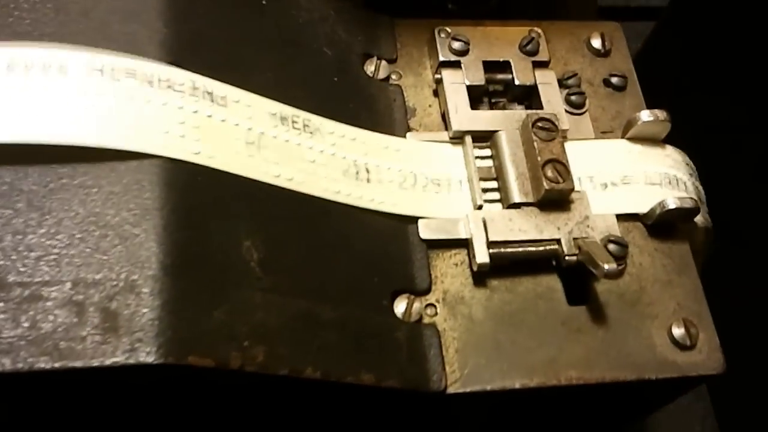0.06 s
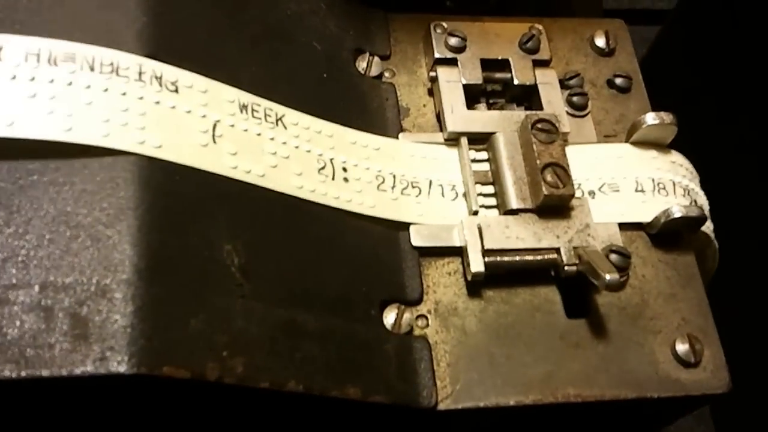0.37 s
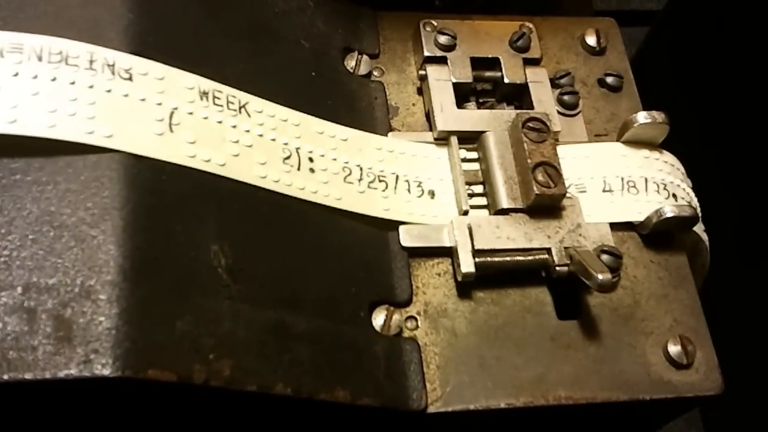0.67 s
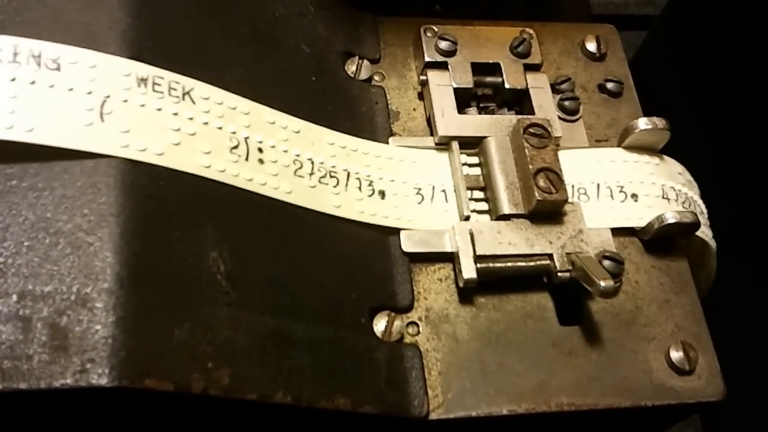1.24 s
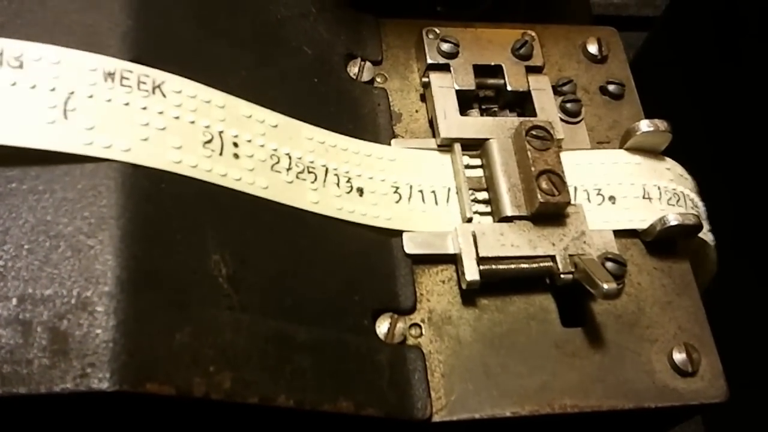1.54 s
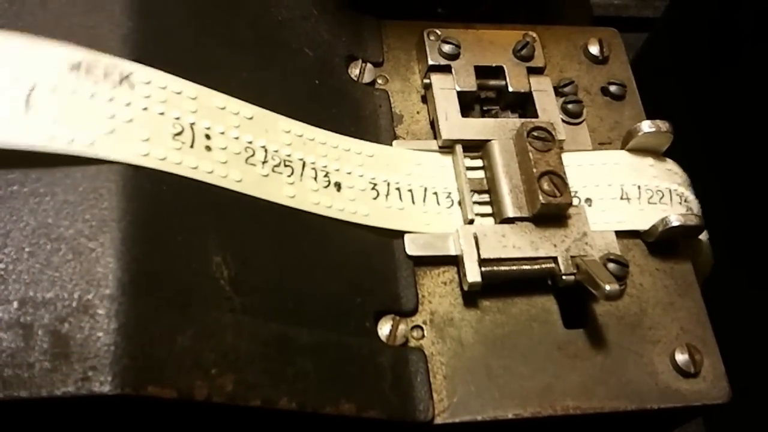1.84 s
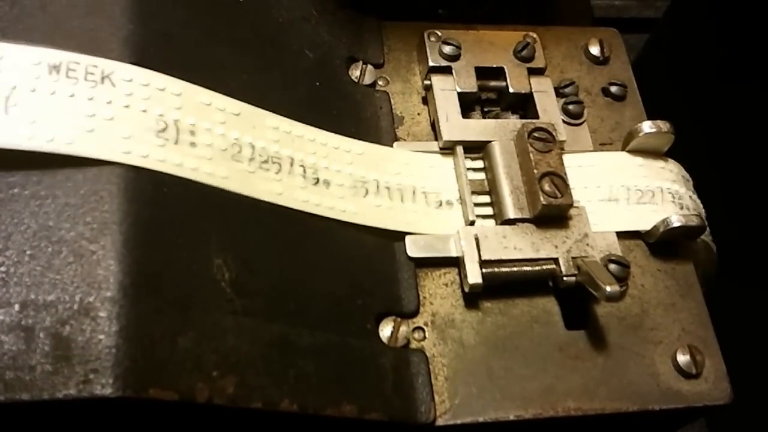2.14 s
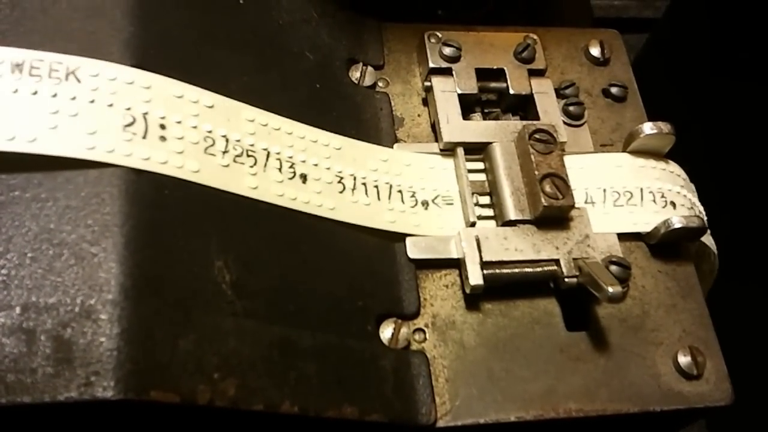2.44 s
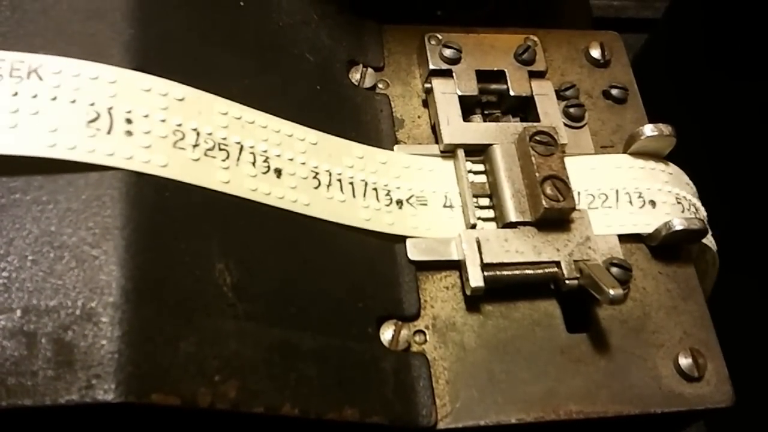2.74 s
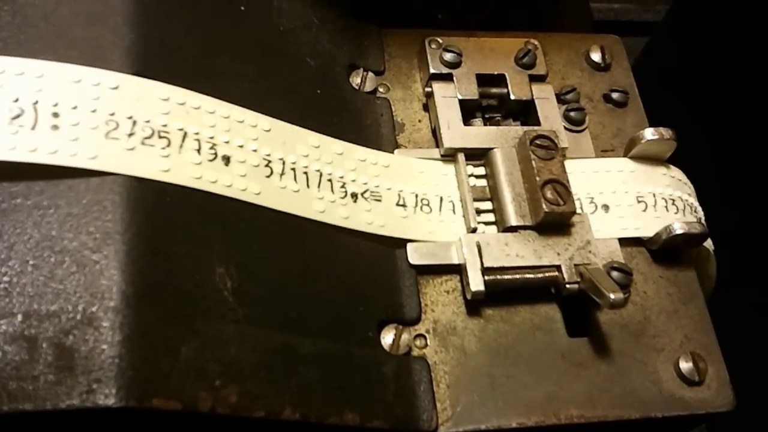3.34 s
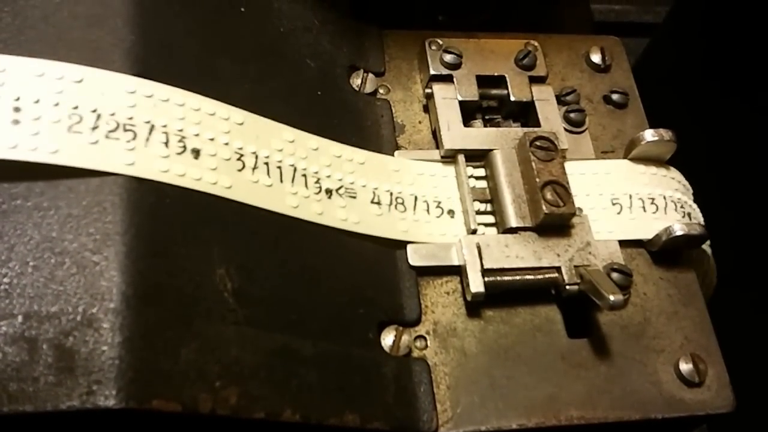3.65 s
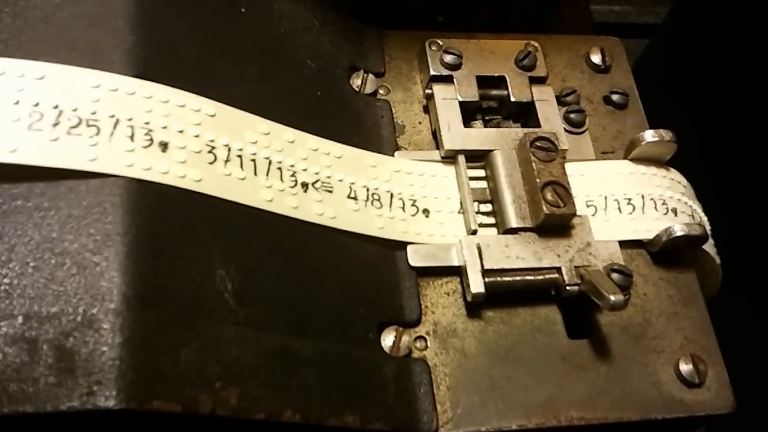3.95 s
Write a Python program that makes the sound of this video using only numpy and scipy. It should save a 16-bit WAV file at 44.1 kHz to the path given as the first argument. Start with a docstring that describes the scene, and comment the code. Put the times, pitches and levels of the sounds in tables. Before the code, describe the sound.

A mechanical paper tape reader clacks about six times a second, each step a sharp metallic snap with a brief ring. Its motor hums and gears whir steadily underneath, heard close up in a small room.

```python
"""A mechanical paper tape reader steps about six characters a second, close up in a small room.
Each cam turn throws the sensing pins against the tape, then the feed pawl clacks the tape on.
Every blow is a burst of tiny metal contacts and rings the frame. Underneath, the motor hums
and its gears whir and tick. The hardest clacks overload the recorder."""
import sys
import numpy as np
from scipy import signal
from scipy.fft import rfft, irfft
from scipy.io import wavfile
from scipy.ndimage import uniform_filter1d, minimum_filter1d

SR = 44100
rng = np.random.default_rng(int(sys.argv[2]) if len(sys.argv) > 2 else 0)


def transcribe(u):
    """Save the signal u as a 16-bit wav file named by the first command-line argument.

    u: samples, shape (n,) or (channels, n), limited to [-1, 1]; the rate is SR.
    q: integer samples, one column per channel.
    """
    v = np.clip(np.atleast_2d(u).T, -1, 1)
    q = np.round(v * 32767).astype(np.int16)
    wavfile.write(sys.argv[1], SR, q)


N = 176400

# pin rises, one per cam turn: t/s, relative level/dB
PIN_RISES = [(0.1292, -5), (0.2894, 0.5), (0.4492, 0), (0.608, -1), (0.7656, -3), (0.9275, -4),
             (1.086, -3.5), (1.2451, -3.5), (1.4048, -2), (1.5645, -1), (1.723, -2), (1.8813, -3),
             (2.0407, -1.5), (2.1999, -2.5), (2.36, -1.5), (2.518, -4), (2.6754, -3.5), (2.835, -2.5),
             (2.9946, -3.5), (3.1538, -1), (3.3117, -2.5), (3.475, -2.5), (3.6321, 0), (3.7904, -3.5),
             (3.9489, -2.5)]
# feed pawl blows: t/s, relative level/dB, low knock offset/dB
PAWL_BLOWS = [(0.001, 19, -13), (0.161, 21, -47.5), (0.314, 15, -19.5), (0.47, 12.5, -25.5),
              (0.484, -4.5, -17.5), (0.639, 14, -8.5), (0.792, 12.5, -46.5), (0.798, 4.5, -21.5),
              (0.954, -1.5, -3.5), (0.975, 19.5, -31.5), (1.11, 8.5, -26), (1.27, 8.5, -16),
              (1.434, 17, -11), (1.589, 22.5, -17.5), (1.598, 13.5, -47.5), (1.746, 12, -19.5),
              (1.912, 9.5, -25), (2.068, 8.5, -28.5), (2.226, 9, -15.5), (2.382, 11, -18), (2.391, 10, -22),
              (2.547, -4, -27), (2.698, 15, -25.5), (2.862, 11, -14.5), (3.025, 17, -24.5),
              (3.175, -1.5, -3), (3.337, 16, -14), (3.495, 11, -34), (3.66, 14, -21), (3.817, 11.5, -16.5),
              (3.974, 13, -40.5)]
RISE_S, CHATTER_PER_S = 0.003, 9000


def amp(db):
    """Decibels to gain."""
    return 10 ** (np.asarray(db) / 20)


def unit(x):
    """Scale to rms 1."""
    return x / np.sqrt(np.mean(x ** 2) + 1e-20)


def read(points, hz):
    """Interpolate a table over log frequency."""
    f, value = np.transpose(points)
    return np.interp(np.log(hz + 1), np.log(f + 1), value)


def add(mix, at_s, sound):
    """Mix a sound in at a time."""
    part = mix[max(round(at_s * SR), 0):][:len(sound)]
    part += sound[:len(part)]


def colour(x, spectrum, size=4096):
    """Minimum-phase filter of unit energy; the table sets shape only."""
    cepstrum = irfft(np.log(amp(read(spectrum, np.fft.rfftfreq(size, 1 / SR)))))
    cepstrum[1:size // 2] *= 2
    cepstrum[size // 2 + 1:] = 0
    taps = irfft(np.exp(rfft(cepstrum)))
    return signal.oaconvolve(x, taps / np.linalg.norm(taps))[:N]


def drift(hz):
    """Slow random wander, rms 1."""
    lowpass = np.exp(-(np.fft.rfftfreq(N, 1 / SR) / hz) ** 2)
    return unit(irfft(rfft(rng.standard_normal(N)) * lowpass, N))


def contacts(per_s, spread_db):
    """Tiny clicks of random sign and size, rms 1."""
    size = amp(spread_db * np.clip(rng.standard_normal(N), -2, 2))
    return unit(rng.choice([-1., 1.], N) * size * (rng.random(N) < per_s / SR))


def blows(times_s, levels_db, decay_s, spread_db):
    """Bursts of metal contacts: linear rise, exponential decay."""
    t, power = np.arange(SR // 10) / SR, np.zeros(N)
    envelope = np.minimum(t / RISE_S, 1) * np.exp(-np.maximum(t - RISE_S, 0) / decay_s)
    for at_s, db in zip(times_s, levels_db):
        add(power, at_s - RISE_S / 2, (amp(db) * envelope) ** 2)
    return np.sqrt(power) * contacts(CHATTER_PER_S, spread_db)


def feed_pawl(engage_lag_s=0.0221):
    """The pawl drops into the ratchet just after the pins, then drives it home with a low knock."""
    # clack spectrum: f/Hz, level/dB
    clack_spectrum = [(100, -44.5), (600, -14), (1700, -17.5), (2300, -4), (3000, -3.5), (3250, 1.5),
                      (3550, 4), (4100, -5.5), (4450, 3), (4680, 6), (4950, -3.5), (5500, 3), (6400, -1),
                      (7250, -0.5)]
    # knock spectrum: f/Hz, level/dB
    knock_spectrum = [(50, -71), (150, -25), (300, -17.5), (460, -12), (620, -7), (745, 0.5), (840, -3.5),
                      (960, 0), (1060, -1.5), (1150, 0.5), (1500, -1.5), (2200, -6), (5000, -14)]
    at_s, db, knock_db = np.transpose(PAWL_BLOWS)
    engage_s = np.transpose(PIN_RISES)[0] + engage_lag_s
    engage = blows(engage_s, np.full(len(engage_s), -5.5), decay_s=0.011, spread_db=5.5)
    clack = engage + blows(at_s, db - 11.5, decay_s=0.0072, spread_db=3)
    knock = amp(-4) * engage + blows(at_s, db + knock_db - 9.5, decay_s=0.007, spread_db=3)
    return colour(clack, clack_spectrum) + colour(knock, knock_spectrum)


def frame_ring(vary_db=2, knock_follow=0.2):
    """Each blow rings a new mix of frame modes; the frame gives less than in proportion to the knock."""
    # frame modes: f/Hz, level/dB, T60/s
    frame_modes = [(217.5, -15.5, 0.14), (258.5, -16, 0.15), (277, -25.5, 0.13), (315, -11.5, .12),
                   (371.2, -9, 0.28), (465, -2, 0.059), (482, 2.5, .22), (551, -4, 0.12), (748, -0.5, 0.11),
                   (958, 7, 0.066), (1113.4, 3.5, .1), (3560, 0.5, 0.23), (6000, -8.5, 0.23)]
    hz, mode_db, t60_s = np.transpose(frame_modes)[:, :, None]
    t, ring = np.arange(SR // 3) / SR, np.zeros(N)
    pushes = [(at_s, -5.5) for at_s, _ in PIN_RISES]
    pushes += [(at_s, knock_follow * (db + knock_db)) for at_s, db, knock_db in PAWL_BLOWS]
    modes = amp(mode_db - 60 * t / t60_s) * np.exp(2j * np.pi * hz * t)
    for at_s, db in pushes:
        gains = amp(db + vary_db * rng.standard_normal(len(hz)))
        phasors = np.exp(2j * np.pi * rng.random(len(hz)))
        add(ring, at_s, ((gains * phasors) @ modes).real * np.minimum(t / RISE_S, 1))
    return amp(-28) * unit(ring)


def room(x, gap_s=0.0079):
    """Short diffuse tail; the bass lasts longest."""
    # room decay: f/Hz, T60/s
    decay = [(150, 0.91), (1000, 0.32), (4000, 0.095), (8000, 0.23)]
    hz, t, noise = signal.stft(rng.standard_normal(SR // 2), SR, nperseg=256)
    tail = signal.istft(noise * amp(-60 * t / read(decay, hz)[:, None]), SR, nperseg=256)[1]
    tail *= np.arange(len(tail)) > gap_s * SR
    return signal.oaconvolve(x, tail / np.linalg.norm(tail))[:N]


def gears(contacts_per_s=5000, flutter_db=1.8):
    """Gear teeth whir and rattle, exciting the housing."""
    # whir spectrum: f/Hz, level/dB
    whir_spectrum = [(25, -35), (60, -33.5), (100, -37), (160, -19), (220, -3.5), (330, -9.5), (620, -12.5),
                     (800, -0.5), (1250, 4), (1500, -1), (1850, -0.5), (2600, 2.5), (3000, -1.5),
                     (3850, -5.5), (4500, 1.5), (5100, 4), (5600, 7.5), (6200, 6), (6480, -2.5), (6750, 11),
                     (7250, -2)]
    # housing resonances: f/Hz, width/Hz, level/dB
    housing_modes = [(211.1, 3.3, -11), (246, 3.7, -19.5), (290.4, 6.8, -13), (472, 4, -2.5),
                     (740.5, 15, -3), (1004, 10, -2.5), (1155, 11, -8.5), (1280, 31, 1.5), (1649, 38, 4),
                     (2228, 30, -4), (2591, 47, 4.5), (2830, 30, -7.5), (5470, 130, 1.5), (5650, 24, 1),
                     (5927, 71, 6), (6090, 40, 6), (7270, 34, -10)]
    grit = contacts(contacts_per_s, spread_db=2) * amp(flutter_db * drift(hz=46.2))
    rattle = contacts(contacts_per_s, spread_db=2.5)
    t, housing = np.arange(SR // 2) / SR, np.zeros(N)
    for hz, width_hz, db in housing_modes:
        mode = np.exp(-np.pi * width_hz * t) * np.sin(2 * np.pi * hz * t)
        housing += amp(db) * unit(signal.oaconvolve(rattle, mode)[:N])
    housing = signal.sosfilt(signal.butter(2, 150, "high", fs=SR, output="sos"), housing)
    return amp(-16.5) * unit(colour(grit, whir_spectrum)) + amp(-23.5) * unit(housing)


def shaft_ticks(tick_hz=71.9, decay_s=0.0005, vary_db=4):
    """The drive shaft ticks twice a turn, uneven in strength."""
    # tick spectrum: f/Hz, level/dB
    tick_spectrum = [(200, -29), (1200, -19), (2600, 6.5), (3800, -15.5), (5200, -7), (6100, -3), (7300, 4)]
    count = np.arange(N) / SR * tick_hz
    age_s = (count % 1) / tick_hz
    strength = amp(vary_db * np.clip(rng.standard_normal(N), -2, 2))[count.astype(int)]
    ticks = strength * np.exp(-age_s / decay_s) * contacts(CHATTER_PER_S, spread_db=2)
    return amp(-24) * unit(colour(ticks, tick_spectrum))


def motor(whine_hz=365.2, speed_waver=0.0032, swell_db=2.5, rough_db=1.5):
    """Rough tones waver with motor speed; the strongest, a whine, swells and fades."""
    # motor and gear tones: f/Hz, level/dB
    tones = [(119.8, -58), (202, -48.5), (282, -45.5), (539.9, -41)]
    # whine envelope: t/s, level/dB
    whine_envelope = [(0, -44), (1.3, -37.5), (2.4, -41), (3.45, -35.5), (4, -43)]
    clock_s = np.cumsum(1 + speed_waver * drift(hz=7)) / SR
    whine_db = np.interp(np.arange(N) / SR, *np.transpose(whine_envelope))
    hum = np.zeros(N)
    for hz, db in tones + [(whine_hz, whine_db)]:
        flutter = amp(swell_db * drift(hz=3) + rough_db * drift(hz=24.6))
        hum += amp(db) * unit(np.sin(2 * np.pi * hz * clock_s) * flutter)
    return hum


def sensing_pins(scrape_lead_s=0.0035, stop_lag_s=0.0039):
    """The lever scrapes and lets go; the pins snap up, then hit their stops."""
    # lever and pin spectrum: f/Hz, level/dB
    pin_spectrum = [(100, -36), (250, 3.5), (700, -19), (1350, -0.5), (1550, 3), (1780, -3), (2200, -4.5),
                    (2900, -1.5), (3250, 7.5), (3900, 1), (4700, -2), (5300, -17.5), (6100, 14.5),
                    (7300, -11)]
    # stop impact spectrum: f/Hz, level/dB
    stop_spectrum = [(100, -66), (400, -28.5), (800, -15), (1100, -8.5), (1600, -13), (2200, -12.5),
                     (3500, -10), (4150, -11), (4450, -10), (4690, 3), (5100, -0.5), (6100, -11),
                     (7300, -9)]
    at_s, db = np.transpose(PIN_RISES)
    scrape = blows(at_s - scrape_lead_s, db - 16.5, decay_s=0.0076, spread_db=1.5)
    snap = blows(at_s, db - 6, decay_s=0.0076, spread_db=0.5)
    stop = blows(at_s + stop_lag_s, db - 0.5, decay_s=0.0053, spread_db=-2)
    return colour(scrape + snap, pin_spectrum) + colour(stop, stop_spectrum)


def limiter(x, threshold=0.95, ratio=4, window_s=0.002):
    """Fast gain dips pull the highest peaks towards full scale."""
    size = round(window_s * SR)
    gain = minimum_filter1d(threshold / np.maximum(abs(x), threshold), 2 * size) ** (1 - 1 / ratio)
    return x * uniform_filter1d(uniform_filter1d(gain, size), size)


def scene():
    """Clacks with room tail and frame ring, over the running drive; mono."""
    clacks = sensing_pins() + feed_pawl()
    return (clacks + amp(-10) * room(clacks) + frame_ring() + gears() + shaft_ticks() + motor())[None]


def record(dry, low_cut_hz=103, high_cut_hz=7480, output_cut_hz=16000):
    """Narrow-band recorder; peaks that pass its limiter clip."""
    band_taps = signal.firwin(221, high_cut_hz, window=("kaiser", 8), fs=SR)[None]
    output_taps = signal.firwin(511, output_cut_hz, window=("kaiser", 9), fs=SR)[None]
    thin = signal.sosfilt(signal.butter(2, low_cut_hz, "high", fs=SR, output="sos"), dry)
    narrow = signal.oaconvolve(thin, band_taps, "same")
    clipped = np.clip(limiter(narrow), -1, 1)
    return signal.oaconvolve(clipped, output_taps, "same")


dry = scene()
out = record(dry)
transcribe(out)
```